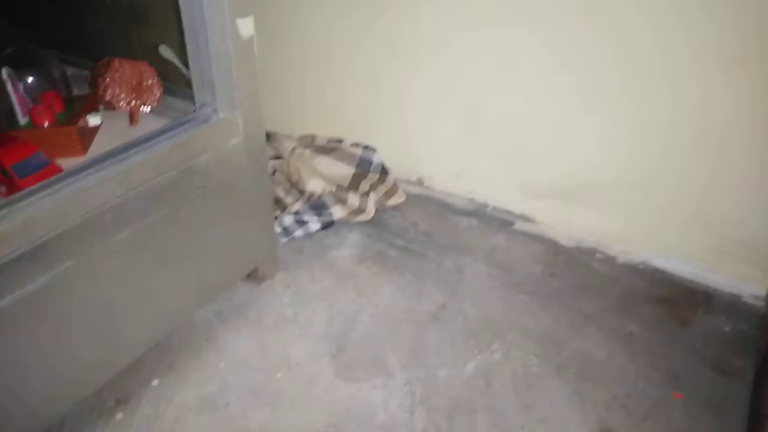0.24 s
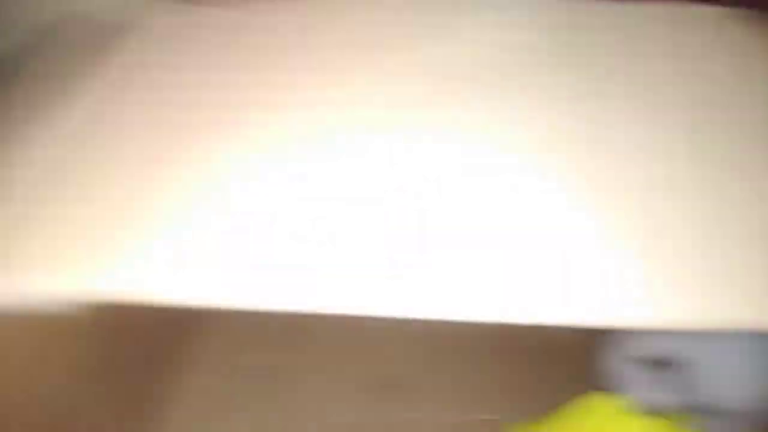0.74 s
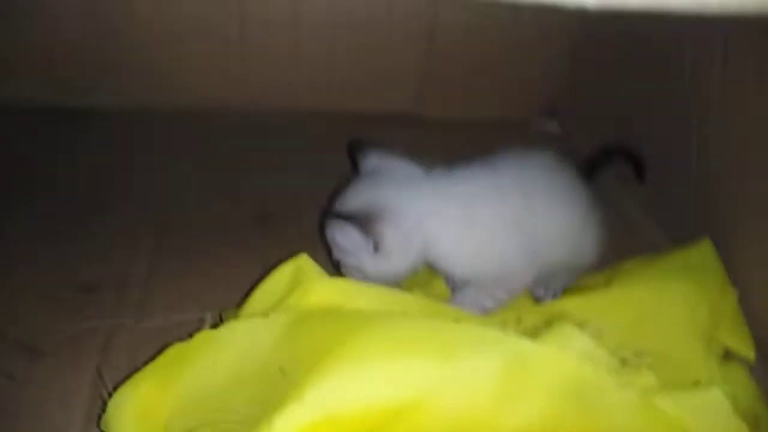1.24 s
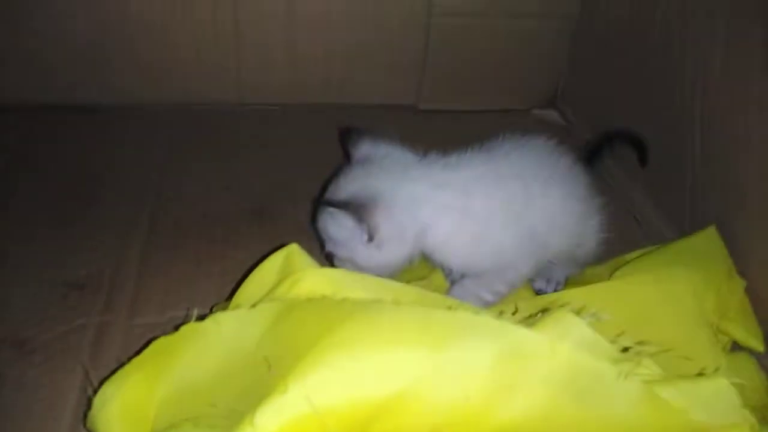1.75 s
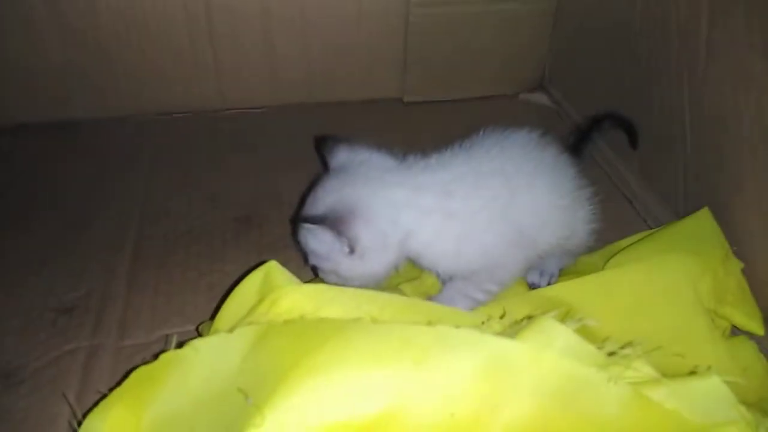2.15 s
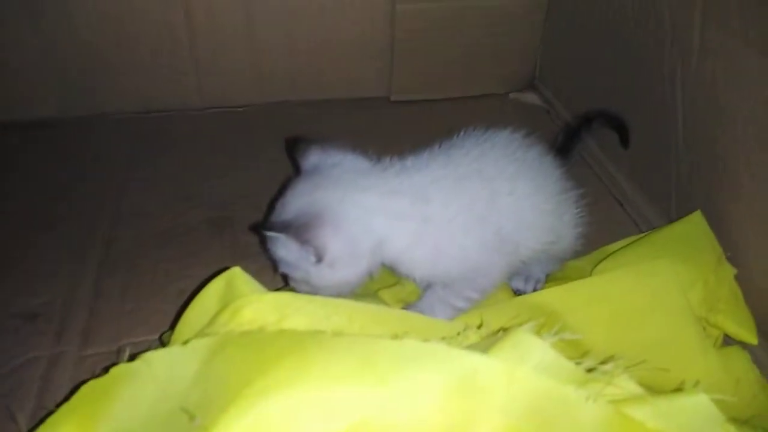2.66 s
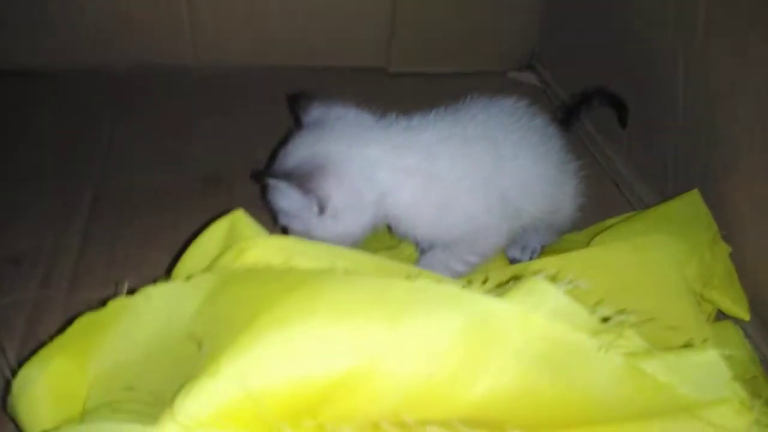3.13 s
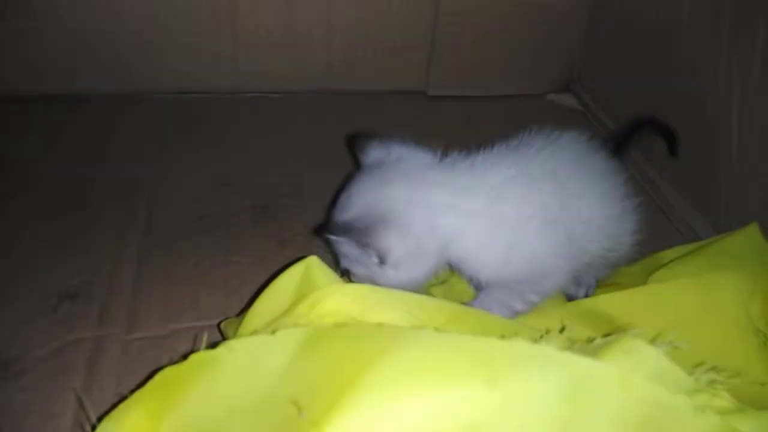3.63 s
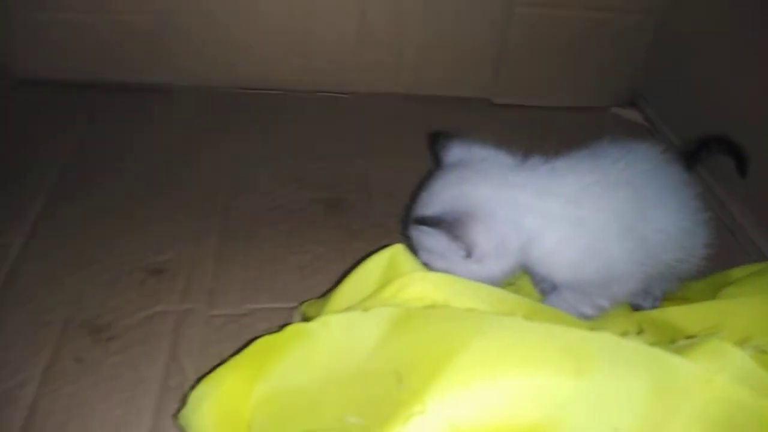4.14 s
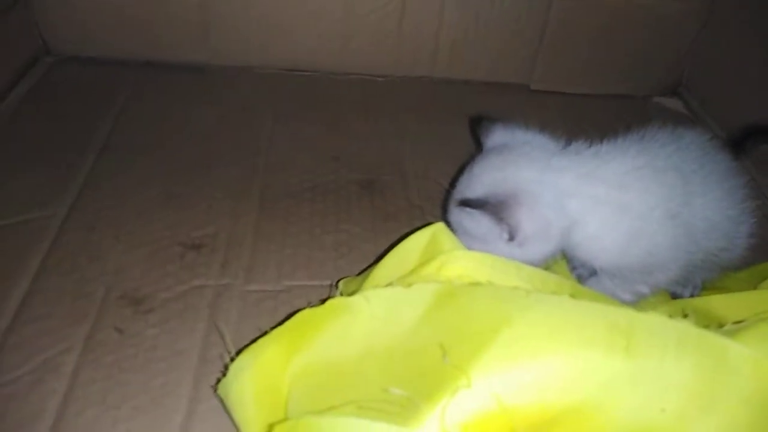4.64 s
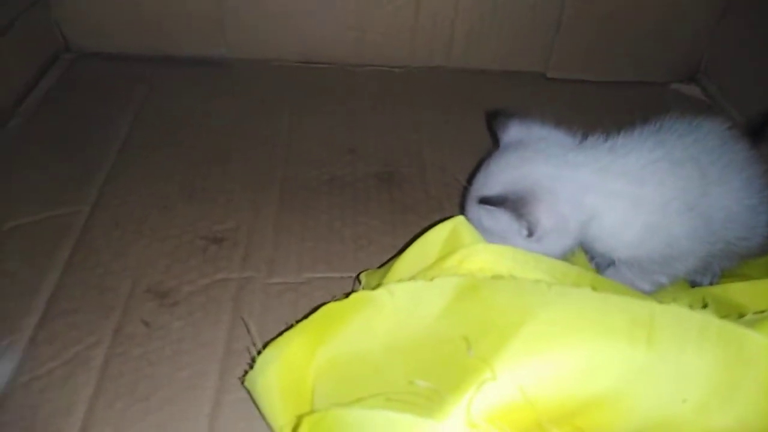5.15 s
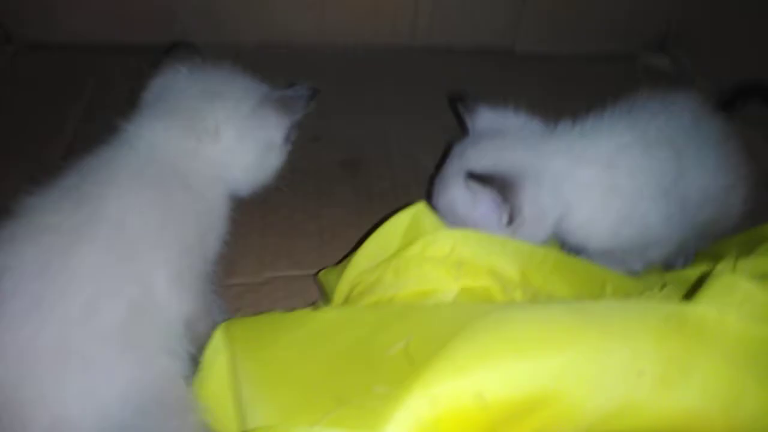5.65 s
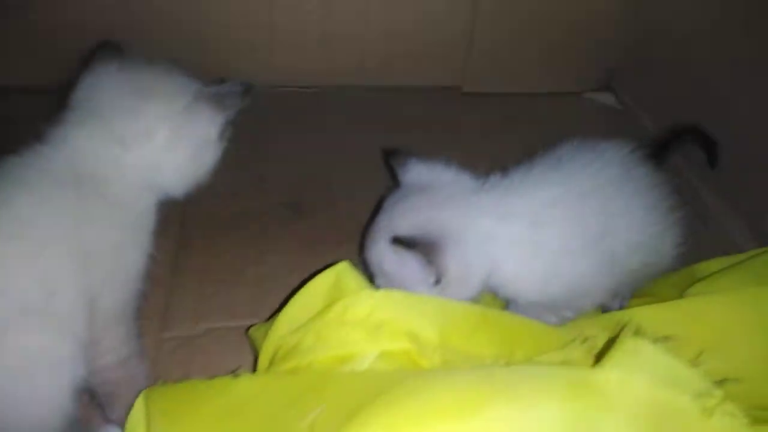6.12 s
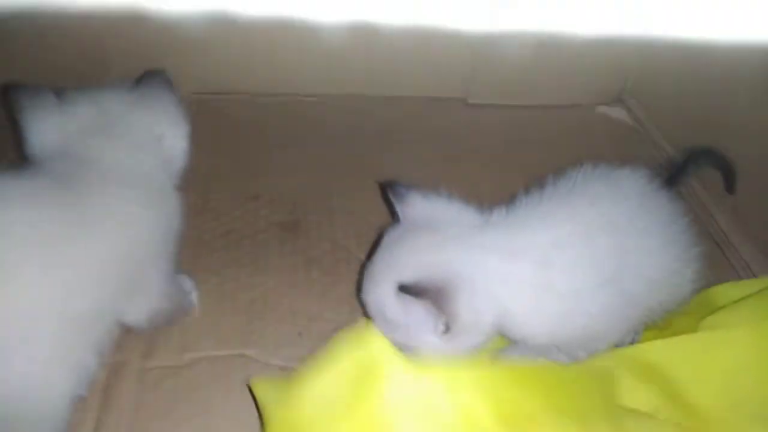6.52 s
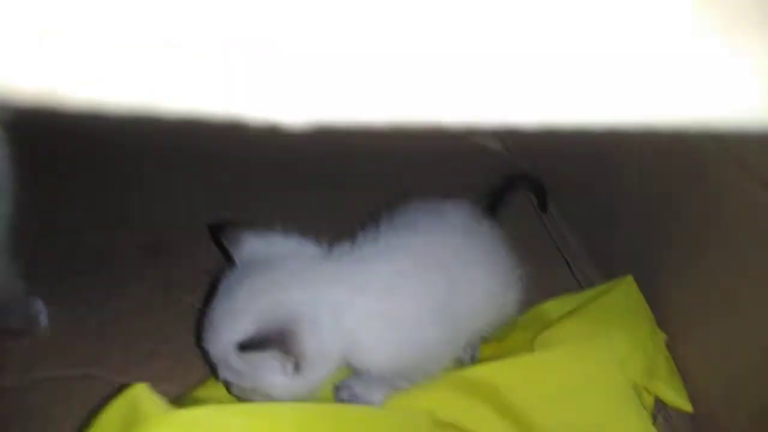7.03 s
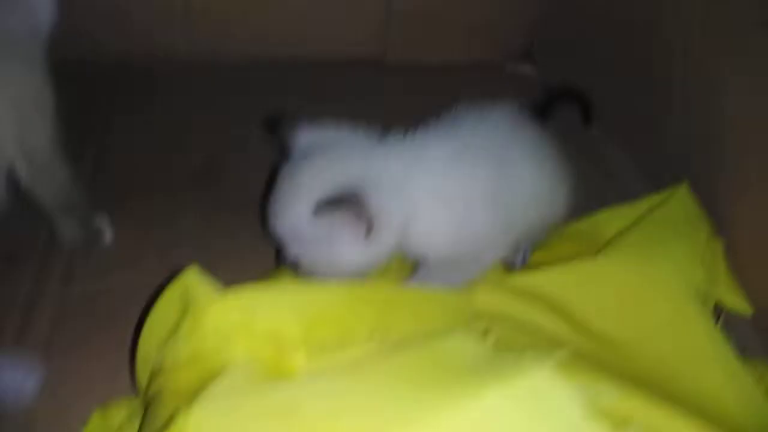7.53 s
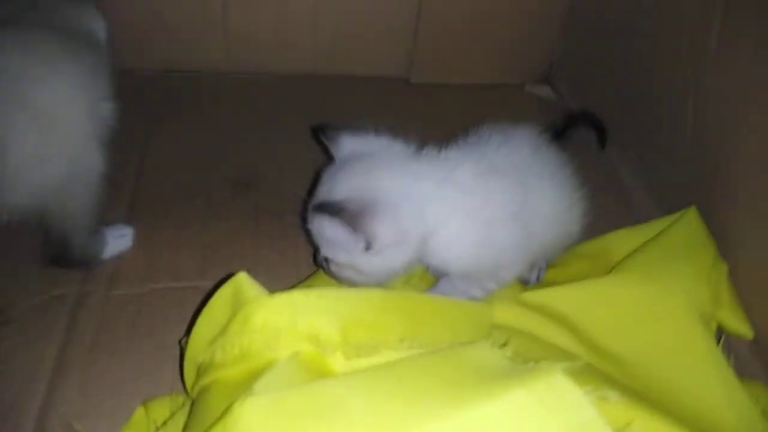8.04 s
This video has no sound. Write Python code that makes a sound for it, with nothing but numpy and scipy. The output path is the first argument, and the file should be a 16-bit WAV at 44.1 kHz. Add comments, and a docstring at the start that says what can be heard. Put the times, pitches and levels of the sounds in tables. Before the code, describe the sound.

In a bare, hard-walled room, a faint, thin kitten mew slides downward as stiff cloth crackles close by, mostly to the left. Snapping creases and dragging folds continue, and a second, clearer mew arches up and down around three seconds. The rustling thins, then a hard cardboard knock with a low thump and rebound breaks in, followed by short scrapes and bright cloth swishes.

```python
"""A thin, almost pure kitten's mew opens over crinkling to the left; a second mew follows later.
Two kittens sit in a cardboard box on stiff, crinkly cloth, in a bare room with hard walls.
The mews are gliding tones; the cloth is coloured noise grains: creases snap, folds crumple and drag.
The cardboard, a bank of decaying modes, is tapped once and later knocked hard, with a thump and a rebound.
Short scrapes and bright swishes come and go over the faint murmur of the room."""
import sys
import numpy as np
from scipy import signal
from scipy.fft import rfft, irfft
from scipy.io import wavfile
from scipy.ndimage import uniform_filter1d, minimum_filter1d

SR = 44100
rng = np.random.default_rng(int(sys.argv[2]) if len(sys.argv) > 2 else 0)


def wav_out(sig):
    """Save sig, one row per channel (or a flat mono array), as 16-bit PCM at SR to the path in sys.argv[1]."""
    wavfile.write(sys.argv[1], SR, np.round(np.clip(np.atleast_2d(sig).T, -1, 1) * 32767).astype(np.int16))


N = 365148
TIME = np.arange(N) / SR
CUTOFF_HZ = 14500


def from_db(db):
    """Decibels to gain."""
    return 10 ** (np.asarray(db) / 20)


def rms_one(x):
    """Scale to unit rms."""
    return x / np.sqrt(np.mean(x ** 2) + 1e-20)


def in_time(rows):
    """Draw each column of an automation curve at every sample."""
    times, *columns = np.transpose(rows)
    return [np.interp(TIME, times, column) for column in columns]


def at_hz(points, hz):
    """Read a table along log frequency."""
    table_hz, value = np.transpose(points)
    return np.interp(np.log(np.maximum(hz, 1)), np.log(table_hz), value)


def pan(db):
    """Left and right gains whose mean is one; positive leans left."""
    gains = from_db(np.array([[.5], [-.5]]) * db)
    return gains / gains.mean(axis=0)


def add(track, s, sound):
    """Mix a sound into a track at a time in seconds."""
    i = max(0, round(s * SR))
    track[..., i:i + sound.shape[-1]] += sound[..., :max(0, N - i)]


def drift(rate_hz):
    """Smooth random wander with unit spread: low-passed noise, drawn every 40 samples."""
    pole = np.exp(-80 * np.pi * rate_hz / SR)
    noise = rng.standard_normal(N // 40 + 2002)
    slow = signal.lfilter([1], [1, -2 * pole, pole * pole], noise)[2000:]  # skip the filter's settling
    return np.interp(np.arange(N) / 40, np.arange(len(slow)), rms_one(slow))


def colour(x, gain_at, size=2048):
    """Causal, minimum-phase filter with a given gain along frequency."""
    gain = np.atleast_2d(gain_at(np.fft.rfftfreq(size, 1 / SR)))
    cepstrum = irfft(np.log(gain))
    # folding the cepstrum forward gives minimum phase
    cepstrum[:, 1:size // 2] *= 2
    cepstrum[:, size // 2 + 1:] = 0
    impulse = irfft(np.exp(rfft(cepstrum)))
    return signal.oaconvolve(x, impulse, axes=1)[:, :N]


def shaped(x, spectrum):
    """Give a sound the tilt of a spectrum table."""
    return colour(x, lambda hz: from_db(at_hz(spectrum, hz)))


def band(x, hz, octaves, order=1):
    """Band-pass around a centre."""
    edges = [hz / 2 ** (octaves / 2), min(hz * 2 ** (octaves / 2), .47 * SR)]
    return signal.sosfilt(signal.butter(order, edges, "band", fs=SR, output="sos"), x)


def grains(shape, spread_db):
    """Dense tiny clicks of very uneven size, differing left and right under shared sizes."""
    sizes = from_db(spread_db * np.clip(rng.standard_normal(shape), -2, 2))
    return rms_one(rng.standard_normal((2, *shape)) * sizes)


def friction(spread_db):
    """Two unrelated streams of friction grains, to be dealt to neighbouring bands."""
    return [grains((N,), spread_db), grains((N,), spread_db)]


def patchy(x, patchy_db, changes_per_s, count=20):
    """Narrow bands swell and sink each on their own, as the folds change shape."""
    centres = np.geomspace(800, 13000, count)
    octaves = np.log2(centres[1] / centres[0])
    total = 0
    for k, hz in enumerate(centres):
        swell_db = patchy_db * np.clip(drift(changes_per_s), -2, 2)
        total = total + band(x[k % 2], hz, octaves, order=2) * from_db(swell_db)
    return total


def strokes(rows, attack_s, release_s):
    """Envelope of sliding strokes: each rises, holds and is released."""
    total = 0
    for s, length, db in rows:
        rise = np.clip((TIME - s) / attack_s, 0, 1)
        fall = np.exp(-np.maximum(TIME - s - length, 0) / release_s)
        total = total + from_db(db) * rise * fall
    return total


def buckle(t, spread_s, click_s, fade_s, count, yield_s=0.00014, crest_s=0.0014, uneven_db=3):
    """Envelope of a crease starting to yield, then giving way in uneven jerks that crest early and weaken."""
    starts = np.append(0, rng.uniform(0, spread_s, count))[:, None]
    unevenness = from_db(uneven_db * rng.standard_normal(starts.shape))
    sizes = unevenness * np.exp(-np.abs(starts - crest_s) / fade_s)
    jerks = sizes * np.exp(-np.abs(t - starts) / click_s) * (t >= starts)
    return np.sqrt(np.sum(jerks ** 2, axis=0)) * (1 - np.exp(-t / yield_s))


def crackle(envelope, spectrum, spread_db, size, ripple_db=3, count=44):
    """Coloured grains under an envelope, scaled by their first samples; a random ripple makes each differ."""
    ripple = np.column_stack([np.geomspace(700, 15000, count), ripple_db * rng.standard_normal(count)])

    def gain_at(hz):
        """Spectrum plus this sound's own ripple."""
        return from_db(at_hz(spectrum, hz) + at_hz(ripple, hz))

    sound = colour(grains(envelope.shape, spread_db) * envelope, gain_at, size=1024)
    return sound / sound[:, :size].std()


# how alike the echoes are left and right: (frequency [Hz], likeness [0-1])
ECHO_LIKENESS = [(150, 0.8), (500, 0.7), (1200, 0.01), (2500, 1), (6000, 0.04)]
# ring of the room: (frequency [Hz], time to fall 60 dB [s])
ROOM_DECAY = [(100, 0.85), (400, 0.48), (1500, 0.38), (4000, 0.44), (8000, 0.26), (14000, 0.41)]


def room(x, build_s=0.00031):
    """Diffuse echoes of unit energy that build up quickly and die away at each band's own rate."""
    t, echoes = TIME[:SR * 3 // 4], 0
    for hz in np.geomspace(60, 15000, 9):
        alike = np.clip(at_hz(ECHO_LIKENESS, hz), 0, 1)
        shared, separate = rng.standard_normal(len(t)), rng.standard_normal((2, len(t)))
        noise = np.sqrt(alike) * shared + np.sqrt(1 - alike) * separate
        echoes = echoes + band(noise, hz, 1, order=2) * from_db(-60 * t / at_hz(ROOM_DECAY, hz))
    echoes = rms_one(echoes * (1 - np.exp(-t / build_s))) / np.sqrt(len(t))
    return signal.oaconvolve(x, echoes, axes=1)[:, :N]


def scattered_room(x, moves_per_s=3, count=4):
    """The sound comes now from one spot, now from another, each with echoes of its own."""
    total = 0
    for k in range(count):
        share = np.maximum(0, np.cos(2 * np.pi * (moves_per_s * TIME - k / count)))
        total = total + room(x * share)
    return total


# pitch of the first mew, falling: (time [s], pitch [Hz])
FALLING_PITCH = [(0.0, 860), (0.06, 850), (0.12, 822), (0.205, 795), (0.245, 728), (0.32, 672)]
# pitch of the second mew, arching: (time [s], pitch [Hz])
ARCHING_PITCH = [(3.055, 785), (3.109, 860), (3.164, 891), (3.218, 911), (3.272, 911), (3.327, 889),
                 (3.381, 849), (3.436, 790), (3.49, 755)]
# strength of each mew's fundamental, one curve per mew: (time [s], level [dB])
MEW_LEVELS = [
    [(-0.02, -44.5), (0.05, -43), (0.11, -51), (0.214, -50), (0.25, -59), (0.31, -58.5)],
    [(3.052, -37.5), (3.068, -36), (3.095, -40.5), (3.23, -34.5), (3.391, -43), (3.423, -36), (3.453, -38),
     (3.49, -41.5)],
]
# share of each mew sent to the room, the first being farther off: (send [dB])
MEW_ROOM_SENDS = [-2.5, -13]
# overtones at the reference pitch: (multiple of the fundamental, level against it [dB])
MEW_OVERTONES = [(2, -25.5), (3, -32.5)]
# the voice catches as it starts and stops: jump in pitch and its half length
CATCH_HZ, CATCH_S = 206, 0.00262


def mews(jitter=0.0029, shimmer_db=0.8, edge_s=0.016, pan_db=2, reference_hz=830,
         opening_db_per_hz=0.074, waver_db=4.5):
    """A nearly pure tone catches at both ends; the mouth opens as pitch climbs and lets overtones out."""
    direct, sent = np.zeros((2, N)), np.zeros((2, N))
    for pitch_rows, rows, room_db in zip([FALLING_PITCH, ARCHING_PITCH], MEW_LEVELS, MEW_ROOM_SENDS):
        inside_s = np.minimum(TIME - rows[0][0], rows[-1][0] - TIME)  # time to the nearer end
        pitch = uniform_filter1d(in_time(pitch_rows)[0], size=1100)
        catch = CATCH_HZ * np.exp(-(inside_s / CATCH_S) ** 2)
        phase = 2 * np.pi * np.cumsum(catch + pitch * (1 + jitter * drift(50))) / SR
        gate = np.clip(inside_s / edge_s + .5, 0, 1)
        overtones = 0
        for multiple, db in MEW_OVERTONES:
            overtones = overtones + from_db(db + waver_db * drift(25)) * np.sin(multiple * phase)
        tone = np.sin(phase) + from_db(opening_db_per_hz * (pitch - reference_hz)) * overtones
        level = from_db(in_time(rows)[0] + shimmer_db * drift(68))
        voice = np.sqrt(2) * tone * gate * level * pan(pan_db)
        direct = direct + voice
        sent = sent + from_db(room_db) * voice
    return direct + room(sent)


# tone of the still room: (frequency [Hz], relative level [dB])
STILL_SPECTRUM = [(20, -10), (60, -1.5), (110, 0), (200, -5.5), (400, -9), (1000, -17), (4000, -19),
                  (14000, -29)]


def still_air(level_db=-77, apart_db=-10):
    """The faint murmur of an empty room: shaped noise, much alike on both sides."""
    air = rng.standard_normal(N) + from_db(apart_db) * rng.standard_normal((2, N))
    return from_db(level_db) * rms_one(shaped(air, STILL_SPECTRUM))


# tone of the fine crinkle: (frequency [Hz], relative level [dB])
CRINKLE_SPECTRUM = [(2000, -34.5), (3500, -25.5), (4800, -16), (5500, 8), (6300, -1), (7600, 11), (8600, 0),
                    (10000, -14), (14200, -32)]


def crinkle(level_db, per_s=100, size_db=5, decay_s=0.0029, octaves=0.57, ticks_db=-8, hiss_db=-8, count=8):
    """Countless lesser creases tick at random over the hiss of sliding cloth."""
    ticks = 0
    for hz in np.geomspace(4200, 11000, count):
        born = rng.random(N) < per_s / count / SR
        sizes = from_db(size_db * np.minimum(rng.exponential(1, N), 2))
        runs = signal.lfilter([1], [1, -np.exp(-1 / (decay_s * SR))], born * sizes + 1e-18)
        ticks = ticks + band(runs * rng.standard_normal((2, N)), hz, octaves)
    ticks = rms_one(shaped(ticks, CRINKLE_SPECTRUM))
    sliding = patchy(friction(spread_db=4), patchy_db=3.0, changes_per_s=19)
    hiss = rms_one(shaped(sliding, CRINKLE_SPECTRUM))
    return from_db(level_db) * (from_db(ticks_db) * ticks + from_db(hiss_db) * hiss)


# cloth dragged over the cardboard: (start [s], length [s], level before the common gain [dB])
DRAG_STROKES = [(-0.03, 0.041, -28), (0.12, 0.41, -32.5), (.67, 0.54, -35.5), (1.44, 0.37, -36.5),
                (1.96, 0.28, -34), (2.32, 0.94, -34.5), (4.31, 0.3, -42), (6.485, 0.24, -29),
                (6.98, 0.25, -33)]
# tone of rubbing: (frequency [Hz], relative level [dB])
RUBBING_SPECTRUM = [(400, -36), (650, -32), (950, -40), (1300, -15), (1800, -5.5), (2400, -1.5),
                    (3000, -2.5), (3700, 5.5), (5000, 2), (9000, -1), (14000, -19)]


def rubbing(flutter_db=2.0, gain_db=-5.5, attack_s=0.031, release_s=0.068):
    """Broad folds drag unevenly over the cardboard: friction grains with ever-shifting colour."""
    grain = patchy(friction(spread_db=7.5), patchy_db=4.5, changes_per_s=14.7)
    drag = shaped(grain, RUBBING_SPECTRUM) * from_db(flutter_db * drift(36))
    return strokes(DRAG_STROKES, attack_s, release_s) * from_db(gain_db) * rms_one(drag)


# loudest snapping creases: (time [s], level before the common trim [dB],
#   duller body against the snap, before the body trim [dB])
LOUD_SNAPS = [(0.117, -16.5, -28), (0.274, -21, -16), (0.3063, -20.5, -41), (0.47, -21, -43),
              (0.682, -17, -22.5), (0.816, -24.5, -28), (0.9186, -27, -6.5), (1.0061, -14.5, -16),
              (1.051, -16.5, -17), (1.139, -21, -16.5), (1.272, -23, -9.5), (1.341, -23.5, -13),
              (1.478, -21.5, -29), (1.5708, -20.5, -20), (1.5885, -16.5, -36), (1.6349, -19.5, -15),
              (1.71, -20.5, -28), (1.738, -21, -27), (1.7438, -13, -22), (1.779, -19.5, -15.5),
              (1.8844, -22, -16.5), (1.987, -23, -21.5), (2.0223, -10, -15), (2.0782, -17.5, -15),
              (2.107, -11.5, -25), (2.2313, -24, -14), (2.297, -13, -20), (2.334, -19, -11.5),
              (2.38, -21, -11), (2.4291, -16.5, -12), (2.493, -24, -23), (2.517, -19, -33),
              (2.5841, -20, -11.5), (2.804, -25.5, -13.5), (2.902, -23.5, -6), (2.9497, -21.5, -11),
              (3.072, -22, -13), (3.142, -15, -19), (3.2137, -20.5, -43), (3.391, -30, -13),
              (3.4482, -17.5, -23.5), (3.571, -14.5, -23), (3.6003, -15.5, -17.5), (3.628, -18.5, -15),
              (3.6677, -18, -13.5), (3.817, -28, -7.5), (3.876, -24, -21), (3.912, -20, -14.5),
              (3.955, -22.5, -18.5), (4.0, -20.5, -20.5), (4.0684, -25, -40), (4.108, -22.5, -16.5),
              (4.152, -24.5, -19), (4.2637, -18, -22.5), (4.3319, -23.5, -12), (4.3712, -13, -22),
              (4.525, -20, -13), (4.557, -21.5, -12), (4.591, -20.5, -15), (4.6315, -21.5, -12.5),
              (4.7809, -22.5, -21), (4.993, -21, -37), (5.2291, -25.5, -37), (5.323, -25.5, -39),
              (5.63, -20, -22.5), (5.831, -24.5, -27), (5.9216, -17.5, -19.5), (5.977, -21, -22),
              (6.1424, -27, -29), (6.3028, -26, -29.5), (6.366, -23.5, -28.5), (6.643, -22, -32),
              (6.8371, -25.5, -15), (7.1508, -25, -26), (7.159, -14.5, -38), (7.38, -27.5, -14.5),
              (7.6445, -21.5, -21), (8.1385, -21.5, -24)]
# lesser snaps: typical gap and its spread (natural log), level above the motion and its spread
LESSER_GAP_S, LESSER_GAP_SPREAD, LESSER_ABOVE_DB, LESSER_SPREAD_DB = .021, .5, 9, 2.5
# their body before its trim; brisker motion bends longer creases: dB of body per dB of motion
LESSER_BODY_DB, BODY_PER_MOTION = -29.5, 4.4
# no lesser crease gives way this close to a loud snap
SNAP_CLEARANCE_S = 0.012


def lesser_snaps(motion_db, count=380):
    """Smaller creases give way in turn, harder and duller in brisk motion: rows of time, level and body."""
    gap, strength, body = rng.standard_normal((count, 3)).T
    times = np.cumsum(LESSER_GAP_S * np.exp(LESSER_GAP_SPREAD * gap))
    brisk_db = np.interp(times, TIME, motion_db)
    db = brisk_db + LESSER_ABOVE_DB + LESSER_SPREAD_DB * strength
    body_db = LESSER_BODY_DB + BODY_PER_MOTION * (brisk_db - motion_db.mean()) + 4 * body
    nearest_s = np.abs(times[:, None] - np.array(LOUD_SNAPS)[:, 0]).min(axis=1)
    kept = (nearest_s > SNAP_CLEARANCE_S) & (times < TIME[-1])
    return np.column_stack([times, db, body_db])[kept]


# tone of a snap: (frequency [Hz], relative level [dB])
SNAP_SPECTRUM = [(3000, -36.5), (4800, -17.5), (5500, 4), (6300, -0.5), (7200, 8.5), (8400, 7),
                 (9800, -7.5), (11800, -9), (13000, -24)]
# tone of its duller body: (frequency [Hz], relative level [dB])
SNAP_BODY_SPECTRUM = [(700, -55), (1500, -31), (2600, -2.5), (4000, 11.5), (5400, 7.5), (6600, -10),
                      (9000, -28.5)]


def snaps(rows, spread_s=.008, click_s=0.0011, fade_s=0.0043, level_db=-10, body_db=17, vary_octaves=0.065):
    """A crease buckles in a run of tiny clicks a few milliseconds long, at its own pitch, over a duller body."""
    out = np.zeros((2, N))
    for s, db, body in rows:
        run = buckle(TIME[:1024], spread_s, click_s, fade_s, count=6)
        own_pitch = np.array(SNAP_SPECTRUM) * [2 ** (vary_octaves * rng.standard_normal()), 1]
        bright = crackle(run, own_pitch, 4, size=200)
        dull = crackle(run, SNAP_BODY_SPECTRUM, 5.5, size=200)
        add(out, s, from_db(db + level_db) * (bright + from_db(body + body_db) * dull))
    return out


# larger folds that crumple: (time [s], level before the common trim [dB],
#   deeper body against the fold, before the body trim [dB], decay before limits [s])
FOLD_CRUMPLES = [(0.182, -35.5, -16, 0.072), (0.2936, -34, -11.5, 0.02), (0.44, -34, -44, 0.093),
                 (0.6833, -33.5, -15.5, 0.071), (0.777, -30.5, -62, 0.087), (1.076, -33, -11.5, 0.0078),
                 (1.2722, -35.5, -25, 0.1), (1.46, -40, -18, 0.067), (1.6337, -37, -19.5, 0.012),
                 (1.8843, -31.5, -18, 0.027), (2.3152, -35.5, -32, 0.021), (2.4581, -31, -25, 0.2),
                 (2.685, -33.5, -6, 0.048), (2.8692, -40, -11.5, 0.15), (3.11, -46.5, -3.5, 0.34),
                 (3.603, -33.5, -19.5, 0.019), (3.8453, -31.5, -18, 0.037), (4.3147, -29.5, -19, 0.13),
                 (4.369, -36, -30, 0.061), (4.5573, -39.5, -10.5, 0.027), (5.178, -52.5, -17.5, 0.012),
                 (5.439, -33, -17.5, 0.04), (5.6305, -38, -41, 0.01), (6.503, -43, -6.5, 0.18),
                 (6.563, -33.5, -9, 0.17), (6.6958, -33, -13.5, 0.047), (6.999, -42.5, -10.5, 0.11),
                 (7.151, -32, -14.5, 0.027), (7.3811, -32.5, -7, 0.033), (7.692, -48, -6.5, 0.019),
                 (7.84, -36.5, -23, 0.035), (8.108, -34.5, -23, 0.017)]
# tone of a fold: (frequency [Hz], relative level [dB])
FOLD_SPECTRUM = [(500, -69), (900, -53), (1500, -18.5), (2300, 3.5), (3000, 5.5), (4300, 4), (7000, -7.5),
                 (12000, -31)]
# tone of its deeper body: (frequency [Hz], relative level [dB])
FOLD_BODY_SPECTRUM = [(400, -36.5), (650, -24), (850, -12.5), (1300, 0), (1800, 3.5), (2800, -29.5)]


def crumples(rise_s=0.002, spread_s=0.065, click_s=0.0024, drag_db=-5, level_db=-5, body_db=2):
    """A larger fold gives way in jerks and drags on, lower in pitch."""
    out, t = np.zeros((2, N)), TIME[:16384]
    for s, db, body, decay_s in FOLD_CRUMPLES:
        decay_s = np.clip(decay_s, .01, .15)
        jerks = buckle(t, spread_s, click_s, decay_s, count=7)
        run = (jerks + from_db(drag_db) * np.exp(-t / decay_s)) * (1 - np.exp(-t / rise_s))
        fold = crackle(run, FOLD_SPECTRUM, 6.2, size=800)
        deep = crackle(run, FOLD_BODY_SPECTRUM, 3.4, size=800)
        add(out, s, from_db(db + level_db) * (fold + from_db(body + body_db) * deep))
    return out


# air notes of the box, two of them close and beating: (frequency [Hz], width [Hz], gain [dB])
BOX_AIR_NOTES = [(170.4, 8.9, 8), (181, 3.6, 16.5), (441, 11, 4)]


def boom(x):
    """The air in the box takes up its own notes from the cardboard and holds them."""
    total = 0
    for hz, width, db in BOX_AIR_NOTES:
        b, a = signal.iirpeak(hz, hz / width, fs=SR)
        total = total + from_db(db) * signal.lfilter(b, a, x + 1e-18)
    return total


# blows on the box: (time [s], strength [dB], lowest reach [Hz], highest reach [Hz],
#   left over right [dB], room send [dB])
BOX_KNOCKS = [(0.6374, -22.5, 128, 1450, 11.5, -9.5), (5.4197, -2, 436, 9050, 17.5, -18.5),
              (5.4274, -8.5, 88, 246, -0.5, -7), (5.4889, -13, 342, 1410, 2.5, -9.5),
              (5.495, -19.5, 700, 1600, 18, -18), (5.659, -20.5, 54.7, 102, 9, -9)]
# ringing modes of the cardboard: (frequency [Hz], relative level [dB], time to fall 60 dB [s])
CARDBOARD_MODES = [(90.2, -26, 0.05), (122, -22.5, 0.06), (186, -10.5, 0.022), (254, -31.5, 0.046),
                   (419, -16.5, 0.02), (834, -4.5, 0.0076), (1160, -5, 0.01), (2007, 2.5, 0.0059),
                   (2250, -11.5, 0.025), (5400, 0, 0.0024), (7220, -1, 0.0059)]


def knocks(crack_db=-3, crack_s=0.00047, rattle_db=-24, rattle_s=.016):
    """Each blow cracks, rattles and rings the cardboard: hard, light contact high, soft, heavy contact low."""
    out, sent, flex, t = np.zeros((2, N)), np.zeros((1, N)), np.zeros(N), TIME[:8192]
    ring = 0
    for hz, db, t60 in CARDBOARD_MODES:
        ring = ring + from_db(db - 60 * t / t60) * np.cos(2 * np.pi * hz * t)
    rough = from_db(crack_db) * np.exp(-t / crack_s) + from_db(rattle_db) * np.exp(-t / rattle_s)
    for s, db, low_hz, high_hz, side_db, room_db in BOX_KNOCKS:
        struck = ring + rough * grains(t.shape, spread_db=3)[0]
        reach = signal.butter(3, [low_hz, high_hz], "band", fs=SR, output="sos")
        blow = from_db(db) * signal.sosfilt(reach, struck)
        add(out, s, pan(side_db) * blow)
        add(sent, s, from_db(room_db) * blow)
        add(flex, s, from_db(db) * blow)  # strength counts twice, so heavy blows stir the air far more
    return out + boom(flex) + room(sent)


# short, rough scrapes: (start [s], length [s], band centre [Hz], level before the common gain [dB])
SCRAPE_STROKES = [(3.833, 0.12, 1870, -54), (4.595, 0.25, 3070, -49.5), (5.169, 0.04, 4200, -44.5),
                  (5.364, 0.02, 2350, -56), (5.915, 0.039, 2370, -52.5), (6.09, 0.046, 2320, -51.5),
                  (6.298, 0.056, 2730, -53), (6.377, .05, 2404, -49), (6.517, 0.39, 417, -75.5),
                  (6.942, 0.075, 2760, -55), (7.82, 0.064, 2120, -51), (8.102, 0.058, 2355, -51)]


def scrapes(attack_s=0.0044, release_s=0.054, catch_db=3, gain_db=3, octaves=0.21):
    """Each short, rough scrape is noise in one narrow band that fades."""
    rasp = grains((N,), spread_db=6) * from_db(catch_db * drift(120))
    total = 0
    for s, length, hz, db in SCRAPE_STROKES:
        narrow = rms_one(band(rasp, hz, octaves, order=2))
        total = total + strokes([(s, length, db)], attack_s, release_s) * narrow
    return from_db(gain_db) * total


# quick, bright slips of cloth: (start [s], length [s], level [dB])
SWISH_STROKES = [(5.425, 0.035, -25.5), (6.385, 0.046, -31.5), (6.51, 0.16, -38.5), (7.152, 0.04, -49),
                 (7.832, 0.022, -34), (7.863, 0.03, -30.5)]
# tone of a swish: (frequency [Hz], relative level [dB])
SWISH_SPECTRUM = [(2500, -39.5), (4000, 5), (5500, -5.5), (7600, 6), (9500, -6.5), (12000, -15),
                  (14200, -26)]


def swishes(spread_db=4, attack_s=.006, release_s=0.0091, flutter_db=2.5):
    """Cloth slips over cloth: a dense, bright grain that holds briefly and stops."""
    slip = shaped(grains((N,), spread_db) * from_db(flutter_db * drift(57.5)), SWISH_SPECTRUM)
    return strokes(SWISH_STROKES, attack_s, release_s) * rms_one(slip)


# fixed tone of the rustling: narrow lifts, thinner around 3.7 and 4.5 kHz:
#   (centre [Hz], width [Hz], lift [dB])
RUSTLE_TONE = [(2526, 15, 4), (3673, 1123, -15), (4150, 100, 4.5), (4536, 995, -12.5), (5350, 97, -1),
               (6920, 100, 3.5), (8100, 43, 1.5)]
# the cloth lies to the left: (frequency [Hz], left over right [dB])
CLOTH_BALANCE = [(1200, 0), (2400, 6), (4000, 9), (5500, 19.5), (7500, 18), (9000, 9), (11500, 5),
                 (14000, 12)]


def rustle_tone(hz):
    """Left and right gain of the rustling along frequency: its fixed tone and the leftward lean."""
    lift_db = 0
    for centre, width, db in RUSTLE_TONE:
        lift_db = lift_db + db / (1 + (2 * (hz - centre) / width) ** 2)
    return from_db(lift_db) * pan(at_hz(CLOTH_BALANCE, hz))


# how briskly the kittens stir the cloth, a guide for crinkle and lesser snaps: (time [s], level [dB])
CLOTH_MOTION = [(0.0, -37), (0.34, -41), (0.53, -39.5), (0.99, -36), (1.27, -40), (2.37, -38), (3.5, -43.5),
                (3.74, -40.5), (4.52, -37), (4.73, -39), (5.09, -45), (5.51, -36), (5.65, -45),
                (6.11, -40.5), (6.37, -45), (6.52, -37), (7.4, -43.5), (8.28, -39.5)]


def cloth(bright_room_db=-2, fold_room_db=0, crinkle_above_db=0.5):
    """All the rustling, toned and leaned left; snaps, crinkle, swishes and folds carry echoes."""
    motion_db, = in_time(CLOTH_MOTION)
    bright = crinkle(motion_db + crinkle_above_db) + swishes()
    bright = bright + snaps(LOUD_SNAPS) + snaps(lesser_snaps(motion_db))
    folds = crumples()
    drags = rubbing() + scrapes()
    echoes = scattered_room(from_db(bright_room_db) * bright + from_db(fold_room_db) * folds)
    return colour(bright + folds + drags + echoes, rustle_tone)


def scene():
    """Mews, room murmur, cloth and cardboard together."""
    return mews() + still_air() + cloth() + knocks()


def limiter(x, size=16):
    """Turn the gain down for an instant wherever a peak would pass 0.97 of full scale."""
    needed = .97 / np.maximum(np.abs(x), .97)
    return x * uniform_filter1d(minimum_filter1d(needed, size=size), size=size)


def record(dry):
    """Peaks are limited, then the top is cut steeply."""
    top_cut = signal.ellip(14, .2, 110, CUTOFF_HZ, fs=SR, output="sos")
    return signal.sosfilt(top_cut, limiter(dry))


dry = scene()
out = record(dry)
wav_out(out)
```